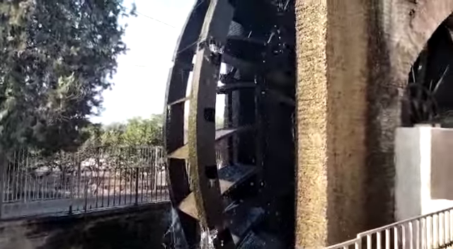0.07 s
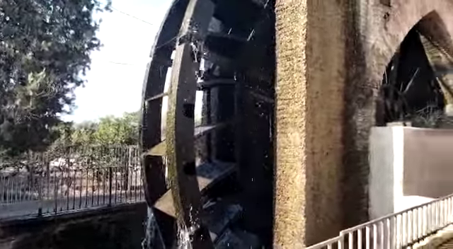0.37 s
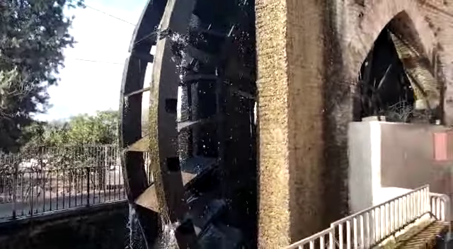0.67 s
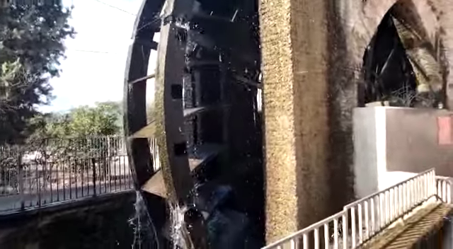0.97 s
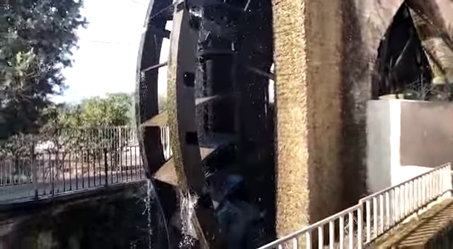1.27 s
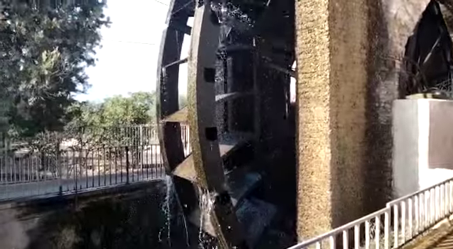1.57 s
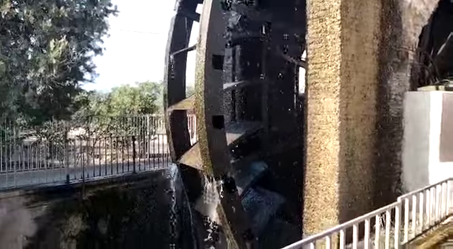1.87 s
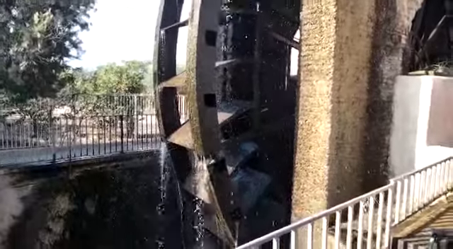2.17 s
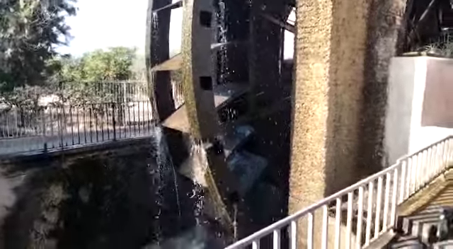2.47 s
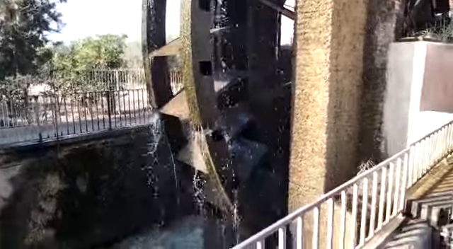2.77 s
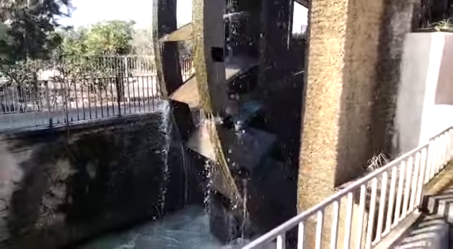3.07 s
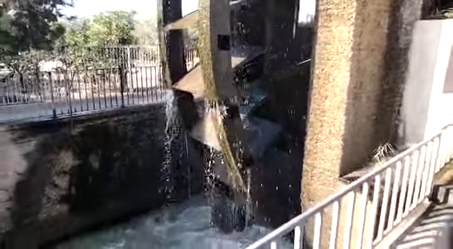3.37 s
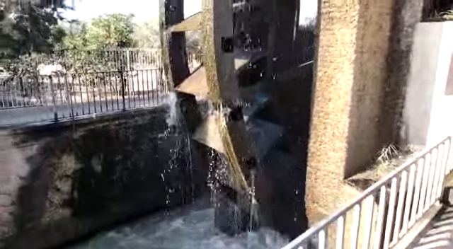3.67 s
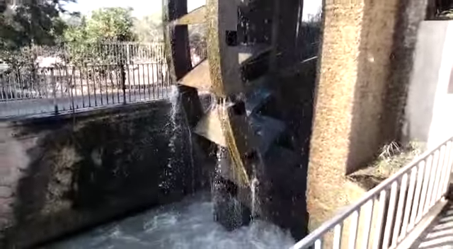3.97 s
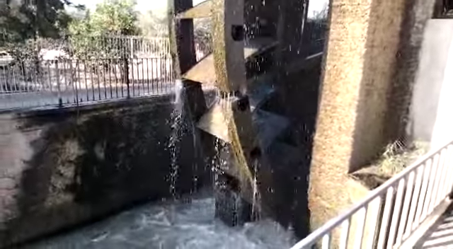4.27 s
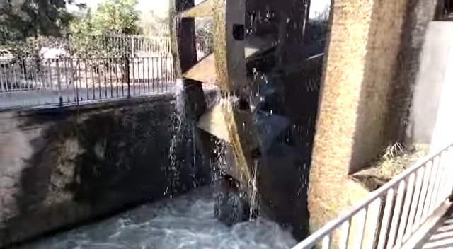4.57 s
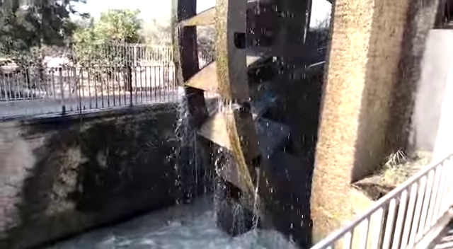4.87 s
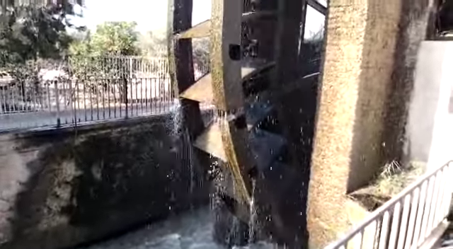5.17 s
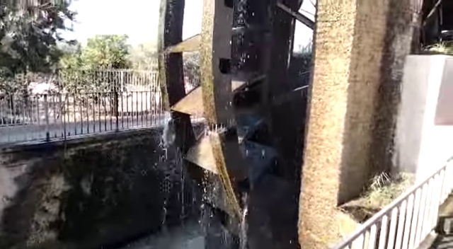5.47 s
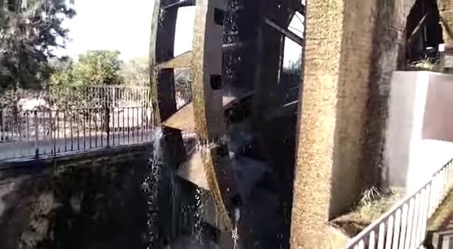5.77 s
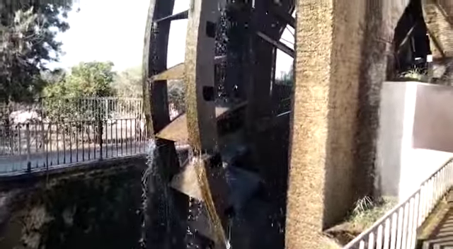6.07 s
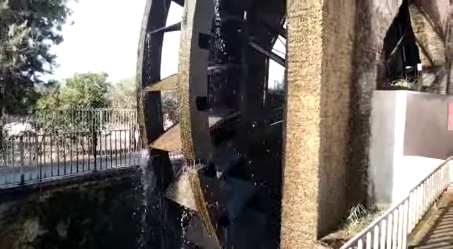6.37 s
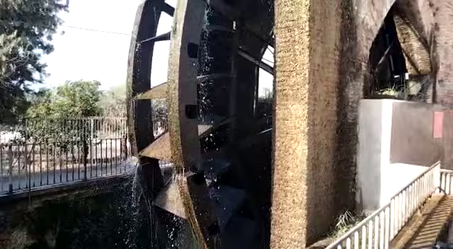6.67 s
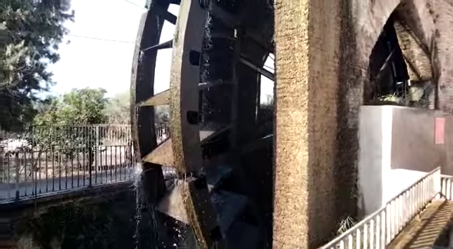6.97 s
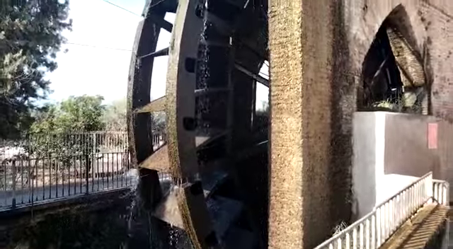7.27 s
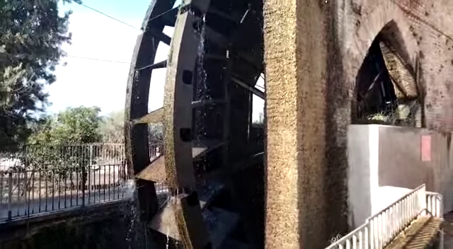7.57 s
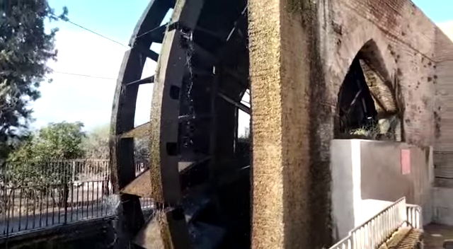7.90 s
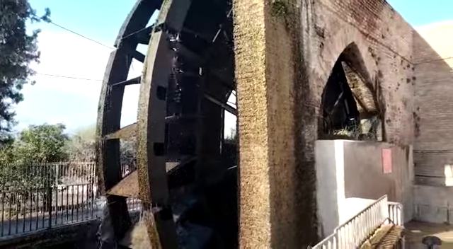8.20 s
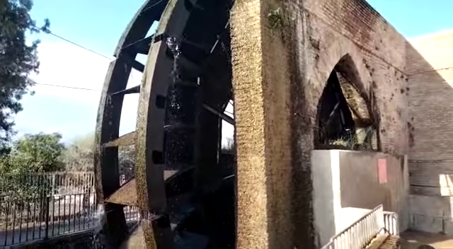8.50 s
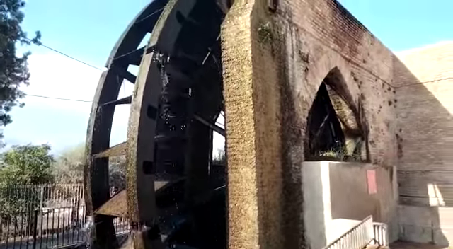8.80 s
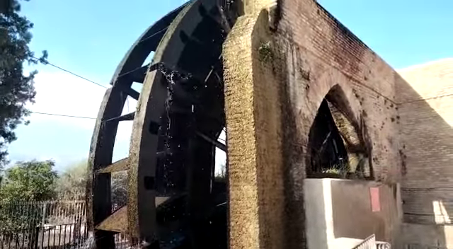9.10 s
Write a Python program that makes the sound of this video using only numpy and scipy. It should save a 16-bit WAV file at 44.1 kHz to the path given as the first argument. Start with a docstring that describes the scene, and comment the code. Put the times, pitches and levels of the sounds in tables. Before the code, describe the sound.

A continuous bright splashing of water falling from a wheel's paddles, over bubbles and a low rush, swelling slightly midway.

```python
"""Beside a stone wall, a tall wooden waterwheel sheds water off its paddles into a narrow channel.
Countless drops patter as spray, a few close by. Plunging streams trap bubbles; the channel churns.
A small mono microphone tilts down to the foam and back: the water swells, brightens, then recedes.
The microphone rings near 9 kHz; its limiter ducks after the sharpest drops."""
import sys
import numpy as np
from scipy import signal
from scipy.fft import rfft, irfft, next_fast_len
from scipy.io import wavfile
from scipy.ndimage import uniform_filter1d, minimum_filter1d

SR = 44100
rng = np.random.default_rng(int(sys.argv[2]) if len(sys.argv) > 2 else 0)


def generate_wav(signal):
    """Clip the signal to [-1, 1] and save it as 16-bit WAV at the path in sys.argv[1]."""
    frames = np.transpose(np.atleast_2d(signal))
    scaled = np.clip(frames, -1, 1) * 32767
    pcm = np.round(scaled).astype(np.int16)
    wavfile.write(sys.argv[1], SR, pcm)


N = 407484

# spray spectrum: (frequency [Hz], relative density [dB])
SPRAY_SPECTRUM = [(300, -22), (1000, -9), (2000, -8), (4500, 2), (5600, 3.5), (7500, 0.5), (9000, 1),
                  (10500, 3.5), (12200, 0.6), (13500, 3), (15500, 1.05)]
# bubble strength by size: (pitch [Hz], relative level [dB])
BUBBLE_SPECTRUM = [(300, -5.5), (600, 3), (1000, -4), (1300, 3.5), (2200, 2), (3200, -2), (5000, 4.5)]
# closest drops: (time [s], click level [dB])
CLOSE_DROPS = [(1.0644, -13.7), (1.6335, -6.3), (2.2966, -14.7), (3.3697, -14.8), (5.1207, -11.0),
               (5.8608, -13.8)]
# separate gulps of water: (time [s], bubble pitch [Hz], level [dB])
GULPS = [(.675, 4950, -31), (.894, 1120, -37), (1.329, 1720, -41), (1.514, 4300, -38), (1.837, 2250, -34),
         (2.496, 1550, -41), (2.678, 1980, -39), (4.45, 600, -36.5), (6.036, 2240, -39)]
# churn spectrum: (frequency [Hz], relative density [dB])
CHURN_SPECTRUM = [(20, -7), (45, 0), (62, -7), (85, -5), (130, 0.5), (175, 1.4), (275, 0.9), (370, -5.5),
                  (480, -2.5), (650, -1), (1000, -6), (2200, -5.5), (4000, -49)]
# swells and lulls in the pour: (centre time [s], length [s], change [dB])
POUR_SURGES = [(.92, 0.72, 1.5), (1.572, 0.24, 0.9), (2.884, .4, 0.6), (5.64, .18, -1.5), (9.24, .25, 1.0)]
# microphone aim: (time [s], tilt [0 = up at the wheel, 1 = down at the foam])
MIC_TILT = [(0, 0), (2.0, .25), (3.0, .68), (4.4, 0.93), (5.4, .9), (6.5, .55), (8.1, 0.039), (9.24, 0)]
# microphone resonances and hollows: (frequency [Hz], width [Hz], gain [dB])
MIC_BANDS = [(3240, 1760, -7), (6730, 1630, -4.5), (8650, 1230, 9.5), (9150, 960, 10.5)]


def spray(pour_db, fine_db, sizzle_db, gush_db, splat_db):
    """Drops hit water and timber, denser as more falls; streams break into gushes and splats."""
    drops = impacts(per_s=16000 * from_db(pour_db) ** 2, spread_db=3.2, max_db=16.5)
    patter = coloured(drops, SPRAY_SPECTRUM)
    fine = signal.sosfiltfilt(signal.butter(3, 13000, "high", fs=SR, output="sos"), patter)
    sizzle = signal.lfilter(*signal.iirpeak(11000, Q=5, fs=SR), patter)
    patter = patter + (from_db(fine_db) - 1) * fine + (from_db(sizzle_db) - 1) * sizzle
    return patter * from_db(gush_db * drift(rate_hz=22) + splat_db * drift(rate_hz=65))


def bubbles(per_s, t60_cycles, clump_db, sizes):
    """Trapped bubbles come in clumps; each rings at the pitch of its size."""
    clicks = impacts(per_s, spread_db=-0.5, max_db=11.5)
    size_class = rng.integers(0, sizes, N)
    out = np.zeros(N)
    for k, hz in enumerate(np.geomspace(300, 5000, sizes)):
        voice = unit_rms(ring(clicks * (size_class == k), hz, t60_cycles / hz))
        level_db = db_at(BUBBLE_SPECTRUM, hz) + clump_db * drift(rate_hz=4.2)
        out += voice * np.sqrt(hz) * from_db(level_db)
    return unit_rms(out)


def close_drops(hz, t60_s, stray_per_s, stray_db):
    """Near drops land as bright ticks: the listed ones plus weaker random strays."""
    clicks = from_db(stray_db) * (rng.random(N) < stray_per_s / SR)
    for time_s, level_db in CLOSE_DROPS:
        clicks[round(time_s * SR)] = from_db(level_db)
    return ring(clicks, hz, t60_s)


def gulps(spread_s, spread_oct, spread_db, t60_cycles, bubble_count):
    """Each gulp traps a short burst of bubbles of about one size."""
    out = np.zeros(N)
    t = np.arange(SR // 8) / SR
    centre_s = t[-1] / 2
    for time_s, hz, level_db in GULPS:
        onset, detune, strength = rng.standard_normal((3, bubble_count, 1))
        pitch_hz = hz * 2 ** (spread_oct * detune)
        cycles = pitch_hz * np.maximum(t - centre_s - spread_s * onset, 0)
        decay = np.exp(-np.log(1000) * cycles / t60_cycles)
        voices = from_db(spread_db * strength) * np.sin(2 * np.pi * cycles) * decay
        burst = unit_rms(voices.sum(axis=0)) * np.sqrt(spread_s / centre_s)  # core rms near 1
        start = round((time_s - centre_s) * SR)
        out[start:start + len(t)] += from_db(level_db) * burst
    return out


def churn(level_db, heave_db):
    """Air clouds heave in the channel: a low, smooth rush."""
    gain = from_db(level_db + heave_db * drift(rate_hz=5.1))
    return gain * coloured(rng.standard_normal(N), CHURN_SPECTRUM)


def pour_change_db():
    """The pour off the paddles swells or slackens smoothly."""
    t = np.arange(N) / SR
    return sum(db * np.cos(np.pi * np.clip((t - centre_s) / length_s, -.5, .5)) ** 2
               for centre_s, length_s, db in POUR_SURGES)


def impacts(per_s, spread_db, max_db):
    """Clicks of random time and sign, exponentially distributed in dB."""
    hits = np.flatnonzero(rng.random(N) < per_s / SR)
    levels_db = np.minimum(spread_db * rng.exponential(1, N)[hits], max_db)
    clicks = np.zeros(N)
    clicks[hits] = from_db(levels_db) * rng.choice([-1, 1], N)[hits]
    return clicks


def ring(clicks, hz, t60_s):
    """Each click starts a decaying sine."""
    r = np.exp(-np.log(1000) / (t60_s * SR))
    w = 2 * np.pi * hz / SR
    return signal.lfilter([0, np.sin(w)], [1, -2 * r * np.cos(w), r * r], clicks + 1e-18)


def drift(rate_hz):
    """Slow random wander, rms 1."""
    hop, warmup = 40, 2000
    r = np.exp(-2 * np.pi * rate_hz * hop / SR)
    noise = rng.standard_normal(N // hop + warmup + 2)
    slow = signal.lfilter([1], [1, -2 * r, r * r], noise)[warmup:]
    return np.interp(np.arange(N) / hop, np.arange(len(slow)), unit_rms(slow))


def coloured(x, spectrum):
    """Filter by a spectrum table; rms 1."""
    size = next_fast_len(N)
    gain = from_db(db_at(spectrum, np.arange(size // 2 + 1) * SR / size))
    return unit_rms(irfft(rfft(x, size) * gain, size)[:N])


def db_at(spectrum, hz):
    """Interpolate a spectrum over log frequency."""
    points_hz, points_db = np.transpose(spectrum)
    return np.interp(np.log(np.maximum(hz, 1)), np.log(points_hz), points_db)


def from_db(db):
    return 10 ** (np.asarray(db) / 20)


def unit_rms(x):
    return x / np.sqrt(np.mean(x ** 2) + 1e-20)


def limiter(x, ceiling_db, hold_s, attack_s):
    """Gain falls just ahead of a peak over the ceiling, holds, returns."""
    allowed = np.minimum(1, from_db(ceiling_db) / (np.abs(x).max(axis=0) + 1e-9))
    hold, attack = round(hold_s * SR), round(attack_s * SR)
    held = minimum_filter1d(allowed, hold + attack, origin=(hold - 1) // 2)
    return x * uniform_filter1d(held, attack)


def scene():
    """The water from one spot on the bank; tilting down lifts spray, bubbles and churn."""
    tilt = np.interp(np.arange(N) / SR, *np.transpose(MIC_TILT))
    surge_db = pour_change_db()
    channel = churn(level_db=-41.5 + 1.5 * tilt, heave_db=1.0)
    plunge_db = -39.5 + 2.1 * tilt + 0.6 * surge_db
    plunge = from_db(plunge_db) * bubbles(per_s=7000, t60_cycles=27.5, clump_db=1.57, sizes=48)
    patter = from_db(-29.5) * spray(pour_db=3 * tilt + surge_db, fine_db=0.5 + 4.2 * tilt,
                                    sizzle_db=0.8 - 2.5 * tilt, gush_db=0.58, splat_db=0.4)
    bursts = gulps(spread_s=.008, spread_oct=.18, spread_db=0.99, t60_cycles=16, bubble_count=30)
    ticks = close_drops(hz=9000, t60_s=.0012, stray_per_s=2.0, stray_db=-18.5)
    water = patter + plunge + ticks + bursts + channel
    return np.array([water, water])


def record(dry):
    """Microphone colour, limiter, steep low-pass."""
    for hz, width_hz, gain_db in MIC_BANDS:
        band = signal.lfilter(*signal.iirpeak(hz, Q=hz / width_hz, fs=SR), dry)
        dry = dry + (from_db(gain_db) - 1) * band
    limited = limiter(dry, ceiling_db=-6.2, hold_s=.092, attack_s=.014)
    cutoff_hz = 15550
    return signal.sosfilt(signal.ellip(14, .1, 80, cutoff_hz, fs=SR, output="sos"), limited)


dry = scene()
out = record(dry)
generate_wav(out)
```